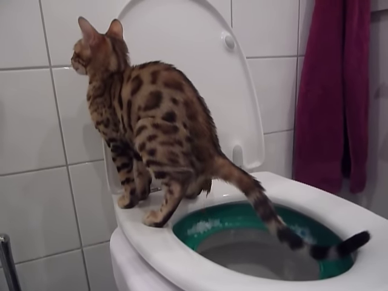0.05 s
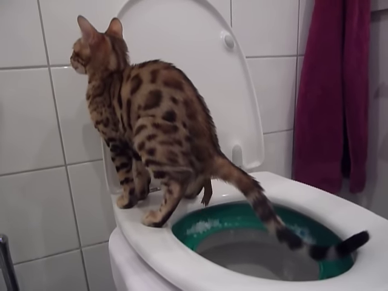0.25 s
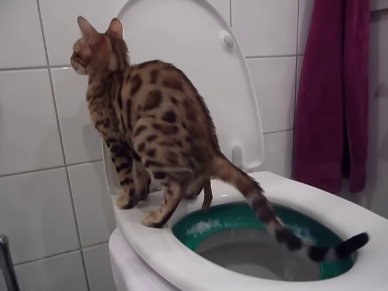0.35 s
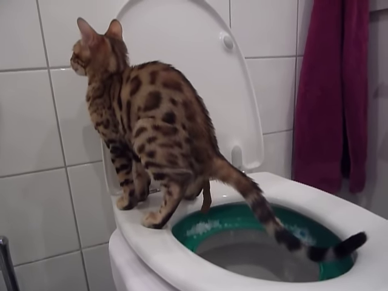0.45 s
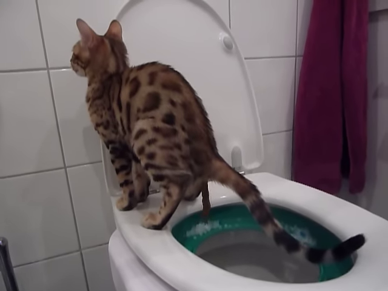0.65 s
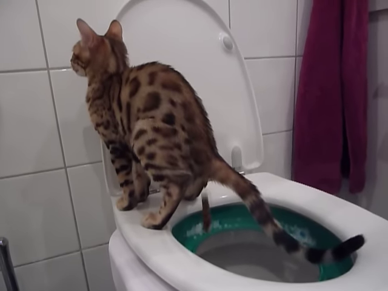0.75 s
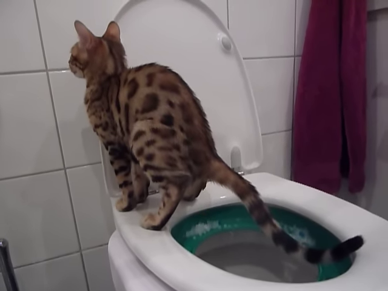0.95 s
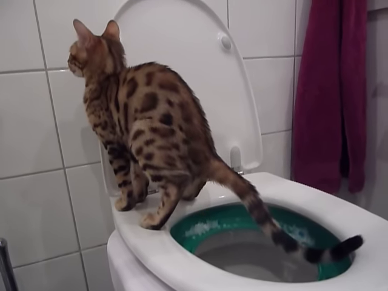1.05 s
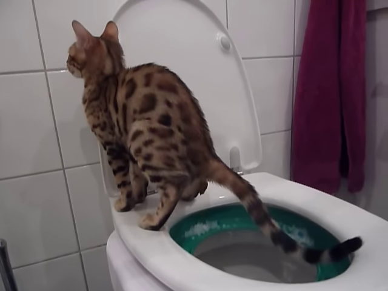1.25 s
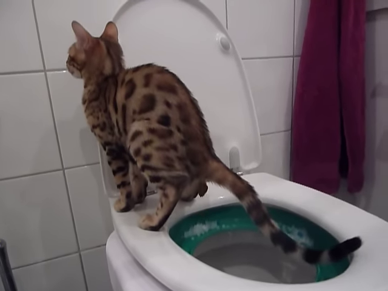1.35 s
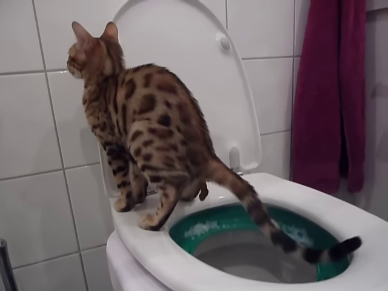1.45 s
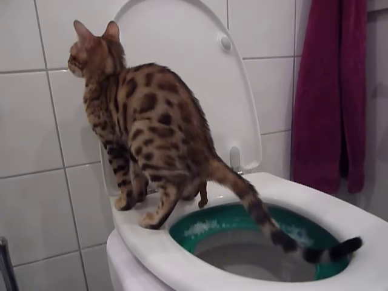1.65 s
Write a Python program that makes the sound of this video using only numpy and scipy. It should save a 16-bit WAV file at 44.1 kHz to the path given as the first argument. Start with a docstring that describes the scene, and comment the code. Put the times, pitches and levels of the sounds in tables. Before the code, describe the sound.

Two short plops sound as droppings fall into a toilet bowl, the first deeper, the second brighter. Faint drips and a low gurgle follow each. The microphone picks up a small tiled bathroom's short echo and quiet hiss.

```python
"""Over a quiet hiss and hum, a faint fizz and a few bubbles: a cat's dropping breaks the water of a
toilet bowl, then goes under with a sharp plop as its air cavity snaps shut, ringing bowl and room.
A second, brighter one follows; small drips and a low gurgle come after each. One microphone in a
small tiled bathroom, far enough from the bowl to hear more room than direct sound."""
import sys
import numpy as np
from scipy import signal
from scipy.io import wavfile
from scipy.ndimage import uniform_filter1d

SR = 44100
rng = np.random.default_rng(int(sys.argv[2]) if len(sys.argv) > 2 else 0)


def digitize_waveform(pressure):
    """Quantize a signal to 16-bit integers and store it at the path in sys.argv[1].

    Rows of a 2-D input are taken as channels; values are limited to [-1, 1].
    """
    field = np.atleast_2d(pressure).T
    bounded = np.clip(field, -1, 1)
    quanta = np.round(bounded * 32767).astype(np.int16)
    wavfile.write(sys.argv[1], SR, quanta)


N = 74970

# spectrum of the room's hiss: f/Hz, relative level/dB
HISS_SPECTRUM = [(25, -8.5), (60, -15), (120, -5.5), (202, -13), (270, -4.5), (355, -7.5), (540, -10.5),
                 (800, -10.5), (1480, -13.5), (2940, -18), (4810, -17), (5500, -19.5), (7130, -22),
                 (8260, -25.5), (8890, -36.5)]
# bubbles and drips: t/s, f/Hz, level/dB, decay/s
BUBBLE_PINGS = [(0.0977, 1070, -59.5, 0.0013), (0.162, 7100, -56, .002), (0.1689, 1580, -54, .001),
                (0.174, 2020, -51, 0.0012), (.182, 1760, -53, .0007), (0.2127, 1360, -48, 0.00054),
                (0.576, 5440, -50.5, 0.0012), (.712, 1270, -66.5, 0.0019), (0.725, 7140, -61, 0.0016),
                (0.734, 7040, -55, 0.00134), (.978, 2144, -54, 0.0029), (.988, 2470, -56, 0.0021),
                (1.017, 1795, -44.5, 0.0011), (1.616, 4430, -56, 0.00056), (1.692, 7000, -64.5, 0.0015)]
# reflections off the porcelain: delay/s, gain
BOWL_ECHOES = [(.0009, -0.099), (.0021, 0.48), (.0048, 0.33), (.0087, -0.81), (0.0118, 0.025), (.0152, .35)]
# reverberation of the tiled room: f/Hz, t60/s
ROOM_T60 = [(100, 0.75), (400, 0.3), (1000, 0.34), (2000, 0.34), (2900, 0.36), (3500, 0.32), (4100, 0.32),
            (5000, 0.32), (6500, .31), (8000, 0.27)]
# breaks in the surface: t/s, level/dB, tick gain, fizz decay/s, centre f/Hz, half-width/octaves
SURFACE_SPLASHES = [(0.0992, -52, 0.35, 0.0083, 5940, 1.9), (0.1305, -47, 0.81, 0.024, 4220, 0.53),
                    (0.153, -48.5, .2, 0.064, 6900, 0.23), (0.2128, -35.5, 0.48, 0.0022, 3120, 0.5),
                    (0.9585, -48, 1, 0.026, 4050, 0.54), (1.0327, -48.5, .3, 0.0048, 4980, 0.33),
                    (.565, -53, .1, 0.017, 5360, 0.2), (0.725, -61.5, 0.57, 0.003, 8000, .2),
                    (1.373, -65.5, 0.87, .003, 4700, 1.5), (1.427, -65.5, 0.87, 0.0042, 2970, 0.75),
                    (1.469, -64.5, 0.77, 0.0019, 5920, 1.6)]
# colour of the deep first plop and of the bright second one: f/Hz, relative level/dB
DEEP = [(40, -38), (75, -30), (110, -15.5), (190, -27), (280, -8.5), (380, -12), (500, -2), (650, -1),
        (800, 1.5), (1100, -3.5), (1800, -4), (2400, -17), (2900, 0), (3450, 2.5), (3750, -1.5),
        (4100, -5.5), (4600, -14.5), (6200, -7.5), (7100, -11), (8000, -13.5), (9000, -30)]
BRIGHT = [(40, -26), (75, -19.5), (110, -13), (190, -19.5), (280, -8.5), (500, -16.5), (800, -9),
          (1100, -22.5), (1450, -1.5), (2000, -10.5), (2550, -4.5), (2900, 1), (3300, 1), (3600, -3.5),
          (4150, -10), (4600, 4), (5600, 3), (6800, -5), (8000, -1.5), (9000, -18.5)]
# droppings going under: t/s, crack level/dB, bowl air level/dB, spray re snap/dB, colour table
CAVITY_PLOPS = [(0.2193, -24, -29.5, -6, DEEP), (1.0399, -25.5, -47, -3.5, BRIGHT)]
# modes of the bowl's bright ring and of the air inside it: f/Hz, relative level/dB, t60/s
BOWL_MODES = [(1418, -13.5, 0.5), (2870, -8, 0.12), (3081, 5.5, 0.33), (3216, 2, .33), (3350, 9.5, 0.2),
              (3470, -10, 0.11), (3610, -7.5, .36), (4680, -8, 0.39), (4896, -10.5, 0.41), (5263, -7, 0.13),
              (5685, -1.5, 0.29), (6120, -4.5, 0.36), (6720, 5, 0.13), (6330, -6, 0.28)]
AIR_MODES = [(752.4, 6.5, 0.21), (462, -15.5, 0.5), (585, -17, 0.49), (1243, -14.5, 0.25),
             (1660, -16.5, 0.27), (1590, -18.5, 0.52), (2099, -5.5, 0.24)]
# water rocking after the plops: t/s, level/dB, decay/s, centre f/Hz
WATER_SLOSHES = [(.42, -57.5, 0.094, 465), (.553, -62.5, 0.014, 440), (1.25, -60, 0.42, 282)]
# narrow dips in the microphone's treble: f/Hz, half-width/Hz, depth/dB
MIC_DIPS = [(5426, 134, 10), (7690, 160, 17), (8280, 110, 23.5), (8803, 455, 18)]

HISS_DB, HISS_PATCH_DB = -67, -0.04
HUM_HZ, HUM_DB, HUM_WAVER = 349.8, -76, 0.22
ROOM_BUILD_S, ROOM_FLUTTER_DB = 0.00074, 1.8
BUBBLE_ATTACK_S, BUBBLE_RISE = 0.0004, 0.0068  # rise: share of the pitch per decay time
RING_ATTACK_S, RING_RE_CRACK_DB = 0.00098, -10
MIC_CUTOFF_HZ = 9050


def amp(db):
    """Decibels to gain."""
    return 10 ** (np.asarray(db) / 20)


def unit(x):
    """Scales to energy 1."""
    return x / np.sqrt(np.sum(x ** 2) + 1e-20)


def strength(db):
    """Gain for a unit-energy sound whose level is counted over ten milliseconds."""
    return amp(db) * np.sqrt(SR / 100)


def read(points, hz):
    """Reads a table on a log-frequency axis."""
    f, value = np.transpose(points)
    return np.interp(np.log(hz + 1), np.log(f), value)


def add(mix, start_s, sound):
    """Mixes a sound in at a time."""
    part = mix[max(round(start_s * SR), 0):][:len(sound)]
    part += sound[:len(part)]


def seconds():
    """Half-second time axis of one event."""
    return np.arange(SR // 2) / SR


def colour(x, db_at, size=4096):
    """Minimum-phase filter with the gain db_at(Hz)."""
    hz = abs(np.fft.fftfreq(size, 1 / SR))
    log_gain = np.log(amp(np.maximum(db_at(hz), -90)))
    taps = np.fft.ifft(np.exp(np.conj(signal.hilbert(log_gain)))).real
    return signal.fftconvolve(x, taps[:size // 2])[:len(x)]


def band(x, centre_hz, octaves):
    """Band-pass with soft shoulders, 3 dB down at `octaves` either side of the centre."""
    return colour(x, lambda hz: -10 * np.log10(1 + (np.log2((hz + 1) / centre_hz) / octaves) ** 4))


def patches(shape, bins, frames):
    """Smooth random pattern over frequency and time, with standard deviation 1."""
    pattern = uniform_filter1d(rng.standard_normal(shape), size=bins, axis=0)
    pattern = uniform_filter1d(pattern, size=frames, axis=1)
    return pattern / pattern.std()


def crackle(per_s, decay_s):
    """A dying shower of tiny clicks."""
    t = seconds()
    clicks = rng.standard_normal(len(t)) * (rng.random(len(t)) < per_s / SR)
    return unit(clicks * np.exp(-t / decay_s))


def hiss():
    """Room tone: steady noise, strongest in the lows."""
    hz, _, noise = signal.stft(rng.standard_normal(N), SR, nperseg=1024, noverlap=768)
    level_db = read(HISS_SPECTRUM, hz)[:, None] + HISS_PATCH_DB * patches(noise.shape, bins=20, frames=8)
    shaped = signal.istft(noise * amp(level_db), SR, nperseg=1024, noverlap=768)[1][:N]
    return amp(HISS_DB) * np.sqrt(N) * unit(shaped)


def hum():
    """One faint tone in the room, wavering at up to 9 Hz."""
    t = np.arange(N) / SR
    rates_hz = rng.uniform(-9, 9, size=12)
    waver = sum(np.exp(2j * np.pi * (hz * t + rng.random())) for hz in rates_hz) / np.sqrt(12)
    tone = (np.exp(2j * np.pi * HUM_HZ * t) * (1 + HUM_WAVER * waver)).real
    return amp(HUM_DB) * np.sqrt(N) * unit(tone)


def bubble(hz, db, decay_s):
    """A bubble or drip in the bowl: a short ping whose pitch rises as it dies."""
    t = seconds()
    pitch_hz = hz * (1 + BUBBLE_RISE * np.minimum(t / decay_s, 10))
    envelope = np.exp(-t / decay_s) * (1 - np.exp(-t / BUBBLE_ATTACK_S))
    ping = np.sin(2 * np.pi * np.cumsum(pitch_hz) / SR) * envelope
    return strength(db) * unit(bathroom(ping, direct_db=-4))


def bathroom(x, direct_db=-7):
    """From bowl to microphone: direct sound, porcelain echoes and the tiles' dense, fluttering tail."""
    t = seconds()
    hz, frame_s, noise = signal.stft(rng.standard_normal(len(t)), SR, nperseg=256)
    flat_noise = noise / (abs(noise) + 1e-12)
    flutter_db = ROOM_FLUTTER_DB * patches(noise.shape, bins=14, frames=2)
    decay_db = 60 * frame_s / read(ROOM_T60, hz)[:, None]
    tail = signal.istft(flat_noise * amp(flutter_db - decay_db), SR, nperseg=256)[1][:len(t)]
    tail *= 1 - np.exp(-t / ROOM_BUILD_S)
    early = np.zeros(len(t))
    for delay_s, gain in [(0.00033, 0.8)] + BOWL_ECHOES:  # the direct path comes first
        early[round(delay_s * SR)] += gain
    return signal.fftconvolve(x, unit(tail) + amp(direct_db) * early)[:len(t)]


def splash(db, tick, decay_s, centre_hz, octaves):
    """A tick as the surface breaks, then fizz."""
    fizz = crackle(per_s=1600, decay_s=decay_s)
    fizz[0] += tick
    return strength(db) * unit(band(bathroom(fizz), centre_hz, octaves))


def plop(db, air_db, spray_db, spectrum):
    """The cavity snaps shut: one crack and a brief spray, ringing the bowl and the air in it."""
    spray = crackle(per_s=540, decay_s=0.0089)
    collapse = amp(spray_db) * band(spray, centre_hz=5000, octaves=1.5)
    collapse[0] += 1  # the snap itself
    crack = unit(colour(bathroom(collapse), lambda hz: read(spectrum, hz)))
    porcelain = amp(RING_RE_CRACK_DB) * ring(BOWL_MODES)
    return strength(db) * (crack + porcelain) + strength(air_db) * ring(AIR_MODES)


def ring(modes):
    """Struck modes swell together, and each dies away at its own rate."""
    t = seconds()
    tones = sum(amp(db - 60 * t / t60) * np.sin(2 * np.pi * hz * t) for hz, db, t60 in modes)
    return unit(tones * (1 - np.exp(-t / RING_ATTACK_S)))


def slosh(db, decay_s, centre_hz):
    """A faint low gurgle as the water rocks and settles."""
    laps = bathroom(crackle(per_s=250, decay_s=decay_s))
    return strength(db) * unit(band(laps, centre_hz, octaves=0.22))


def scene():
    """The water sounds over the room tone, as they reach the microphone."""
    mix = hiss() + hum()
    for source, events in [(bubble, BUBBLE_PINGS), (splash, SURFACE_SPLASHES),
                           (plop, CAVITY_PLOPS), (slosh, WATER_SLOSHES)]:
        for start_s, *settings in events:
            add(mix, start_s, source(*settings))
    return mix[None]


def record(dry):
    """A small mono microphone with narrow dips in the treble and a steep cut above them."""
    def response_db(hz):
        return -sum(depth * np.exp(-((hz - f) / width) ** 2) for f, width, depth in MIC_DIPS)

    heard = colour(dry[0], response_db)
    low_pass = signal.firwin(401, MIC_CUTOFF_HZ, window=("kaiser", 8), fs=SR)
    return signal.fftconvolve(heard, low_pass, "same")[None]


dry = scene()
out = record(dry)
digitize_waveform(out)
```